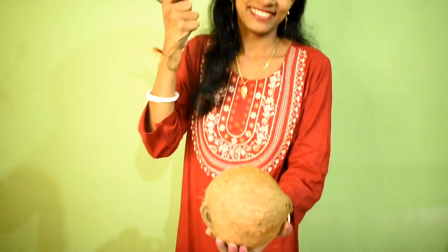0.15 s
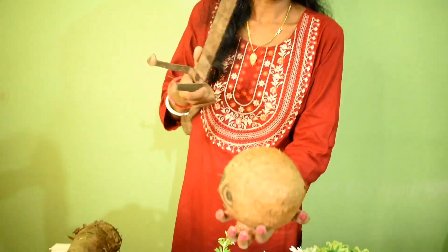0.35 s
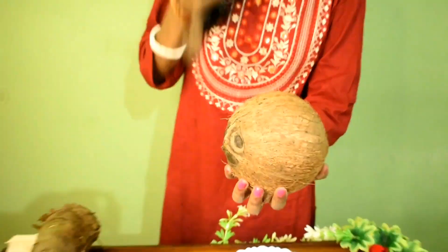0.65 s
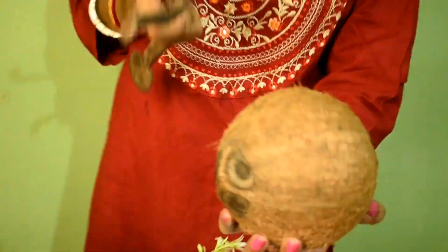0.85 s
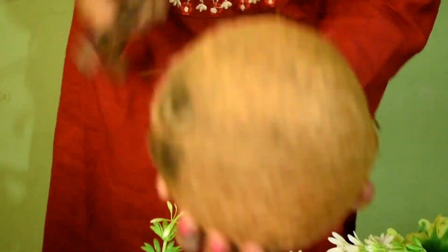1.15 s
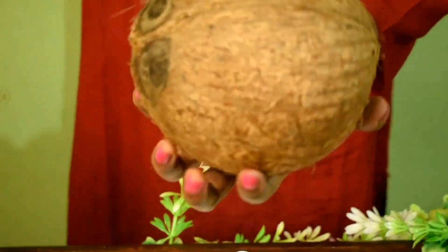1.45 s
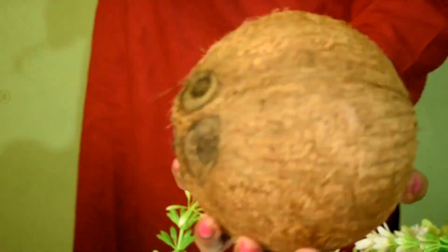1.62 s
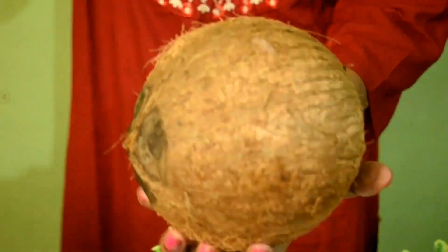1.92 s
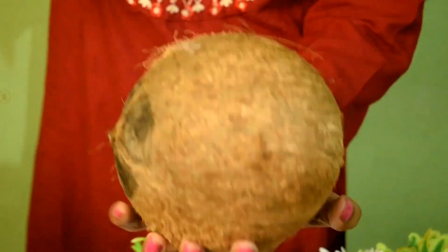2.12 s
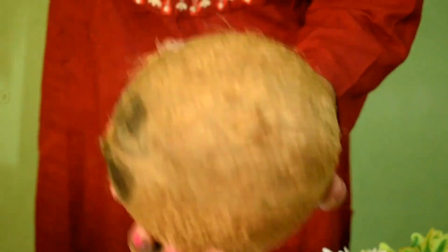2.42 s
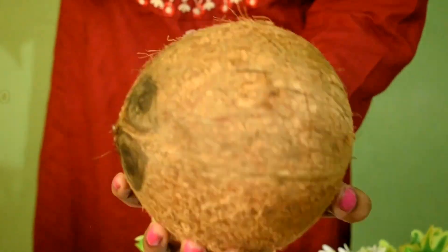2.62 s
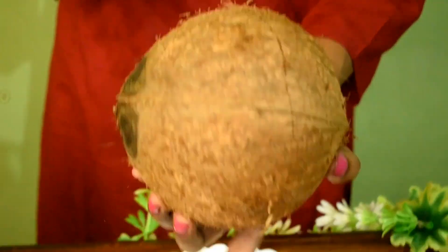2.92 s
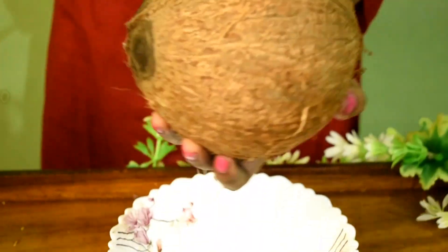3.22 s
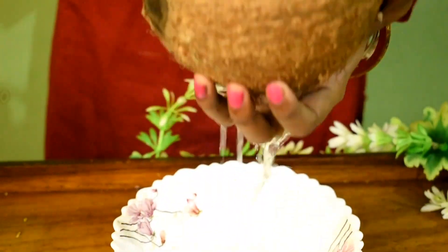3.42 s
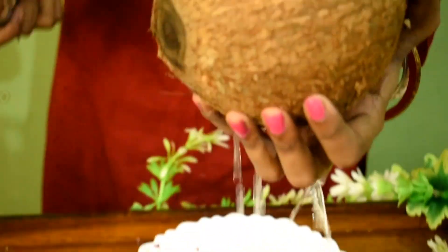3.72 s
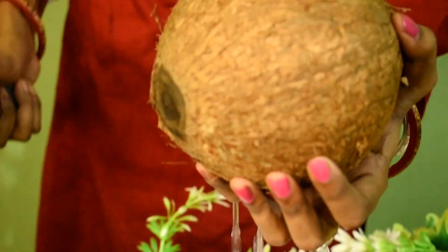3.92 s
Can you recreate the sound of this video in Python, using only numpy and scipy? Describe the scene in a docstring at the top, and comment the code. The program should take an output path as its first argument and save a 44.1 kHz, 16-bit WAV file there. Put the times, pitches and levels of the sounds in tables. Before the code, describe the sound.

Close stereo microphones capture six full, overdriven coconut chops after the fading echo of an earlier one, with small clicking scuffs halfway between. The hard room answers each with a dense, flattened crash. Then come cracking snaps, a dying echo, a short husk rustle, and quiet fan hum. A thin seep of water grows into a bubbly patter with bigger plops at the end.

```python
"""First the dying echo of a chop: a heavy iron blade strikes a hand-held coconut in a bare, ringing room.
Crunch and shell rings make each chop; a lighter tap, a scuff with three bright rings, falls between chops.
The seventh chop splits the shell in snaps and knocks, husk fibres hiss in the palm, and the water starts to
trickle onto a plate as rising bubbles over a spray. Behind, a fan throbs: motor tones and an air wash.
The blows overload the recorder, whose limiter flattens the room's echo into a long crash."""
import sys
import numpy as np
from scipy import signal
from scipy.fft import rfft, irfft, next_fast_len
from scipy.io import wavfile

SR = 44100
rng = np.random.default_rng(int(sys.argv[2]) if len(sys.argv) > 2 else 0)


def wrap_up_sound(samples):
    """Save the sound to the file named by the first command line argument, as 16-bit audio."""
    columns = np.atleast_2d(samples).T
    # keep every value between -1 and 1, then stretch to whole-number steps
    tamed = np.clip(columns, -1, 1)
    steps = np.round(tamed * 32767).astype(np.int16)
    wavfile.write(sys.argv[1], SR, steps)


N = 178716
TIME = np.arange(N) / SR
BRIEF = TIME[:SR // 8]  # the time axis of one short sound


# Heavy chops on the nut. Each row: start in seconds, level in dB, treble in dB,
# thump in dB relative to the chop.
CHOPS = [(-.095, -3, -1, -45), (0.3496, 6.5, 0, -23), (.805, 4.5, 0.5, -4), (1.2523, 6.5, 1.5, -13),
         (1.685, 3, 5, -14), (2.1294, 4, 1.5, -5), (2.5518, 6, 6, -9.5)]
# Resonances of the shell under the blade. Each row: pitch in Hz, level in dB, 60 dB decay time in s.
SHELL_RINGS = [(866, -9, 0.0098), (1563, -17.5, 0.048), (2435, -16.5, 0.021), (3140, -9.5, 0.0037),
               (4190, -7.5, 0.0026), (5230, -10, 0.0046)]
# Spectrum of the breaking husk and shell. Each row: frequency in Hz, level in dB per Hz.
CRACK_SPECTRUM = [(20, -41), (130, -40), (250, -20.5), (450, -14), (750, -6), (1200, 0), (2000, 0.5),
                  (4000, 1.5), (6000, -3.5), (9000, -9), (13500, -18), (15000, -18), (16000, -77)]


def chops(treble_hz=4500, push_s=0.0012, room_db=8):
    """The blade bites through the husk, rings the shell and shoves the nut into the palm."""
    out = np.zeros((2, N))
    for start_s, db, treble_db, thump_db in CHOPS:
        shell = 0
        for hz, ring_db, t60 in SHELL_RINGS:
            # each ring varies by about 1 dB from blow to blow
            shell = shell + from_db(ring_db + rng.normal()) * ring(hz, t60)
        blow = burst(crack(CRACK_SPECTRUM, t60=0.017, grit_db=12.5) + shell)
        treble = blow - lag(blow, corner(treble_hz))
        blow = blow + (from_db(treble_db) - 1) * treble
        add(out, start_s, from_db(db) * blow, room_db)
        # the shove is one brief push of air, nearly without echo
        push = np.exp(-BRIEF / push_s)
        add(out, start_s, from_db(db + thump_db) * push, room_db=-30)
    return out


# Light taps between the chops. Each row: start in seconds, level in dB, spot touched from 0 to 1,
# clatter in dB.
TAPS = [(.125, -12, 0.07, 2), (.598, -13.5, 0.98, -8.5), (1.0362, -9, 0.18, 0.5), (1.474, -11.5, 0.2, -3.5),
        (1.915, -10, 0.1, -18), (2.337, -7, 0.78, 2.5)]
# Spectrum of a tap's scuff. Each row: frequency in Hz, level in dB per Hz.
SCUFF_SPECTRUM = [(20, -68), (130, -36.5), (300, -19), (800, -0.5), (1300, 0), (2700, 0), (5500, -10),
                  (7500, -11), (11000, -22), (15000, -28)]
# From spot 0 to spot 1 the main ring weakens and the two higher ones close in; these are set at spot 0.
MAIN_RING_HZ, MIDDLE_RING_HZ, UPPER_RING_HZ = 3110, 3352, 4947
MAIN_RING_DB, UPPER_RING_DB = 6.5, 2
SPOT_LOSS_DB, MIDDLE_RISE_OCTAVES, UPPER_FALL_OCTAVES = 5.5, 0.13, 0.212
# A clattering contact feeds the higher rings and damps the main one: shares of the clatter's dB.
UPPER_FOLLOWS, DAMPING_FOLLOWS = 0.36, 0.37


def taps(room_db=0.5, main_t60=0.011, middle_t60=0.015, upper_t60=0.015, scuff_db=1.5):
    """Light contacts: a short scuff and three bright rings whose mix depends on the spot touched."""
    out = np.zeros((2, N))
    for start_s, db, spot, clatter_db in TAPS:
        scuff = from_db(scuff_db) * crack(SCUFF_SPECTRUM, t60=0.021, grit_db=28)

        damped_t60 = main_t60 / from_db(DAMPING_FOLLOWS * clatter_db)
        main = from_db(MAIN_RING_DB - SPOT_LOSS_DB * spot) * ring(MAIN_RING_HZ, damped_t60)

        middle_hz = MIDDLE_RING_HZ * 2 ** (MIDDLE_RISE_OCTAVES * spot)
        middle = from_db(clatter_db) * cluster(middle_hz, middle_t60)

        upper_hz = UPPER_RING_HZ / 2 ** (UPPER_FALL_OCTAVES * spot)
        upper_db = UPPER_RING_DB + UPPER_FOLLOWS * clatter_db
        upper = from_db(upper_db) * cluster(upper_hz, upper_t60)
        add(out, start_s, from_db(db) * (scuff + main - middle - upper), room_db)
    return out


# The shell tearing open and shifting in the hand. Each row: start in seconds, snap level in dB,
# hollow knock level in dB, knock pitch in Hz.
SPLITS = [(2.556, -6, -4.5, 612), (2.597, 0, -5.5, 665), (2.642, -11, -11.5, 562), (2.659, -5.5, -12, 840),
          (3.018, -33.5, -30, 674), (3.036, -53, -36, 676)]


def splits():
    """The crack runs on in snaps, and the opened nut knocks hollow."""
    out = np.zeros((2, N))
    for start_s, snap_db, knock_db, knock_hz in SPLITS:
        snap = from_db(snap_db) * crack(CRACK_SPECTRUM, t60=0.043, grit_db=10)
        knock = from_db(knock_db) * ring(knock_hz, t60=0.015)
        add(out, start_s, snap + knock, room_db=1.0)
    return out


# Spectrum of the rubbing husk. Each row: frequency in Hz, level in dB per Hz.
HUSK_SPECTRUM = [(100, -1), (700, 17), (1500, -4.5), (4000, 5), (8000, 0), (15000, 0.5)]
# The husk rubs in the palm ever harder until the nut settles; its level peaks at the stop.
RUB_START_S, RUB_STOP_S, RUB_PEAK_DB = 2.72, 3.01, -31.5
RUB_SWELL_DB_PER_S, RUB_RELEASE_DB_PER_S = 55, 165


def husk():
    """Fibres rub in the palm: a hiss that swells after the last chop and dies when the nut settles."""
    swell_db = RUB_SWELL_DB_PER_S * (RUB_STOP_S - TIME)
    release_db = RUB_RELEASE_DB_PER_S * (TIME - RUB_STOP_S)
    level = from_db(RUB_PEAK_DB - np.maximum(swell_db, release_db))
    hiss = rms_one(colour(diffuse(N), HUSK_SPECTRUM))
    return ramp(RUB_START_S, attack_s=0.063) * level * hiss


# Big drops on the plate. Each row: start in seconds, level in dB, starting pitch of the bubble in Hz.
DROPS = [(3.473, -45.5, 10400), (3.772, -54, 2780), (3.807, -38.5, 7000), (3.8637, -30, 4920),
         (3.877, -33, 4180), (3.903, -31.5, 2570), (3.9468, -28, 2580), (3.953, -31.5, 2360),
         (4.006, -24.5, 2720), (4.007, -20.5, 4600)]
# Spectrum of a drop's splat. Each row: frequency in Hz, level in dB per Hz.
SPLAT_SPECTRUM = [(300, -19), (1500, -8.5), (3000, -6), (7000, 2), (10000, -8), (15000, -5)]
# Spectrum of the fine spray. Each row: frequency in Hz, level in dB per Hz.
SPRAY_SPECTRUM = [(300, -8), (1500, 8), (3000, 2), (6000, 2), (10000, 8), (15000, 3)]
# A bubble climbs faster the lower it starts and the harder its drop falls; the rate is a typical drop's.
TYPICAL_DROP_DB, TYPICAL_BUBBLE_HZ, RISE_OCTAVES_PER_S = -29, 3020, 110
RISE_FOLLOWS, RISE_PITCH_POWER, BUBBLE_T60_S = 0.78, 1.8, 0.027
# The water first seeps thinly; when the crack gives way the flow swells evenly to a pour.
SEEP_S, SEEP_ATTACK_S, SEEP_DB = 3.54, 0.055, -51.5
POUR_S, POUR_ATTACK_S, POUR_DB = 3.767, 0.23, -38


def water():
    """Big drops strike the plate, and thin streams patter over a fine spray."""
    return big_drops() + streams()


def big_drops(splat_db=-4, droplet_db=-10, scatter_s=0.014):
    """Each drop splats, traps a bubble that rises in pitch, and throws off three droplets."""
    out = np.zeros((2, N))
    for start_s, db, hz in DROPS:
        pitch_factor = (TYPICAL_BUBBLE_HZ / hz) ** RISE_PITCH_POWER
        force_factor = from_db(RISE_FOLLOWS * (db - TYPICAL_DROP_DB))
        rise = RISE_OCTAVES_PER_S * pitch_factor * force_factor
        splat = crack(SPLAT_SPECTRUM, t60=0.048, grit_db=10)
        drop = ring(hz, BUBBLE_T60_S, rise) + from_db(splat_db) * splat
        for late, pitch in rng.random((3, 2)):
            droplet_hz = hz * 1.6 ** (2 * pitch - 0.5)
            droplet = ring(droplet_hz, BUBBLE_T60_S / 2, rise / 2)
            drop = drop + from_db(droplet_db) * np.roll(droplet, int(late * scatter_s * SR))
        add(out, start_s, from_db(db) * drop, room_db=-5.5)
    return out


def streams(drops_per_s=450, spread_db=3.5, spray_db=-2):
    """Many small bubbles at random times and pitches patter over a hiss of spray as the flow grows."""
    patter = np.zeros(N + len(BRIEF))
    for place, pitch, size in rng.random((int(drops_per_s * N / SR), 3)):
        hz = 2000 * 6 ** pitch
        first = int(place * N)
        # a few bubbles stand out well above the rest
        level_db = -spread_db * np.log(max(size, 0.02))
        patter[first:first + len(BRIEF)] += from_db(level_db) * ring(hz, t60=30 / hz, rise=29)
    spray = from_db(spray_db) * rms_one(colour(diffuse(N), SPRAY_SPECTRUM))
    seep = from_db(SEEP_DB) * ramp(SEEP_S, SEEP_ATTACK_S)
    pour = from_db(POUR_DB) * ramp(POUR_S, POUR_ATTACK_S)
    return (seep + pour) * rms_one(rms_one(patter[:N]) + spray)


# Tones of the fan motor. Each row: pitch in Hz, level in dB, depth of the throb from 0 to 1.
MOTOR_TONES = [(197, -54.5, 0.15), (220.3, -47.5, 0), (242, -55.5, 0), (261, -52.5, 0.03), (413.6, -47, 1),
               (443.7, -46.5, 0.05), (447.8, -47, 0.24), (620, -52, 0.4), (680, -51, 0.4),
               (844, -55.5, 0.2), (1490, -59, 0.2), (5760, -69, .4)]
# Spectrum of the air chopped by the blades. Each row: frequency in Hz, level in dB per Hz.
WASH_SPECTRUM = [(150, -60), (330, -8), (420, -3), (520, -16.5), (680, 5.5), (900, -19), (1500, -15),
                 (3000, -53)]
# Spectrum of the room's steady rush. Each row: frequency in Hz, level in dB per Hz.
AIR_SPECTRUM = [(20, -16), (50, -10), (100, -3), (160, -7), (230, 1.5), (330, 5), (700, 9.5), (1000, 1.5),
                (1500, -1.5), (2000, -7.5), (4000, -12.5), (8000, -20), (16000, -21.5)]
# The fan's blades pass at a steady rate; one of the throbs peaks at THROB_S.
BLADE_PASS_HZ, THROB_S = 10.82, 3.49


def fan(wash_db=-47, wash_depth=0.21, sway=2.6, air_db=-42.5, waver=0.85, waver_s=0.043):
    """Motor tones and a wash of air, both chopped by the passing blades, over the room's steady rush."""
    throb = np.cos(2 * np.pi * BLADE_PASS_HZ * (TIME - THROB_S))
    hum = 0
    for hz, db, depth in MOTOR_TONES:
        # tones that the blades scatter most also waver most
        wander = waver * rms_one(lag(lag(rng.standard_normal(N), waver_s), waver_s))
        phase = 2 * np.pi * (hz * TIME + rng.random()) + depth * (sway * throb + wander)
        hum = hum + from_db(db) * np.sqrt(2) * (1 + depth * throb) * np.sin(phase)
    wash = from_db(wash_db) * rms_one(colour(diffuse(N), WASH_SPECTRUM)) * (1 + wash_depth * throb)
    air = from_db(air_db) * rms_one(colour(diffuse(N), AIR_SPECTRUM))
    return hum + wash + air


# How the bare room dies away. Each row: frequency in Hz, 60 dB decay time in s.
ROOM_DECAY = [(100, 0.28), (700, 0.4014), (1500, 0.405), (3500, 0.3718), (6000, 0.3833), (10000, 0.3085),
              (16000, 0.33)]
# Standing waves between the walls. Each row: pitch in Hz, level in dB.
STANDING_WAVES = [(443, -19.5), (528, -25.5), (665, -24), (802, -22.5), (959, -24.5), (1044, -22.5),
                  (1557, -28), (1668, -28.5), (2162, -32)]
WALL_DELAY_S, EARLY_DB = 0.02, -5.5


def room_echo(mode_t60=0.49, build_s=0.0021):
    """Stereo response of the room: weak early scatter, then the walls answer and die away band by band."""
    t, hz = TIME[:SR], np.fft.rfftfreq(SR, 1 / SR)
    noise = rfft(diffuse(SR))
    centres = np.array(ROOM_DECAY)[:, 0]
    tail = 0
    # each band fades into its neighbours
    for share, (_, t60) in zip(np.eye(len(centres)), ROOM_DECAY):
        band = irfft(noise * at_hz(np.c_[centres, share], hz), SR)
        tail = tail + band * from_db(-60 * t / t60)
    for mode_hz, db in STANDING_WAVES:
        mode = np.sin(2 * np.pi * (mode_hz * t + rng.random()))
        tail = tail + from_db(db) * mode * from_db(-60 * t / mode_t60)
    walls_s = [WALL_DELAY_S - build_s, WALL_DELAY_S + build_s]
    tail = tail * from_db(np.interp(t, walls_s, [EARLY_DB, 0]))
    return tail / np.sqrt(np.sum(tail ** 2) / 2)


def add(out, start_s, sound, room_db, shade_hz=7000):
    """Place a short sound in the room; the nut shades its direct treble and moves, so each echo is new."""
    heard = from_db(room_db) * signal.fftconvolve(sound[None], room_echo(), axes=1)
    heard[:, :len(sound)] += lag(sound, corner(shade_hz))
    start = round(start_s * SR)
    # a sound that starts before time 0 is heard only from there on
    heard = heard[:, max(-start, 0):N - start]
    first = max(start, 0)
    out[:, first:first + heard.shape[1]] += heard


# Left-right likeness of diffuse sound at the microphones. Each row: frequency in Hz, likeness from 0 to 1.
LIKENESS = [(40, .75), (130, .88), (300, .994), (700, .998), (1400, .997), (2800, .972), (5600, .92),
            (10000, .82), (15000, .58)]


def diffuse(size):
    """White stereo noise, most alike in the low middle, a little less in the deep bass, least in the treble."""
    alike = np.clip(at_hz(LIKENESS, np.fft.rfftfreq(size, 1 / SR)), 0, 1)
    mid, side = rfft(rng.standard_normal((2, size)))
    shared = np.sqrt((1 + alike) / 2) * mid
    opposed = np.sqrt((1 - alike) / 2) * np.array([side, -side])
    return irfft(shared + opposed, size)


def ring(hz, t60, rise=0):
    """A struck resonance that builds up over about a cycle; a bubble also rises, in octaves per second."""
    pitch = hz * 2 ** (rise * np.minimum(BRIEF, t60))
    cycles = np.cumsum(np.minimum(pitch, SR / 2)) / SR
    return burst(np.sin(2 * np.pi * cycles) * (1 - np.exp(-cycles)) * from_db(-60 * BRIEF / t60))


def cluster(hz, t60, spread=0.16, count=6):
    """Close modes of an uneven body, strongest in the middle, which blur into one broad ring."""
    modes = hz * (1 + spread * np.linspace(-1, 1, count))
    strengths = np.hanning(count + 2)[1:-1] * rng.choice([-1, 1], count)
    return burst(sum(strength * ring(mode, t60) for strength, mode in zip(strengths, modes)))


def crack(spectrum, t60, grit_db):
    """A sharp contact and the crunch of fibres; so many break that no pitch stands out."""
    contact = burst(1.0 * (BRIEF == 0))
    grit = burst(rng.standard_normal(len(BRIEF)) * from_db(-60 * BRIEF / t60))
    snaps = rfft(contact + from_db(grit_db) * grit)
    # keep the phases, level the spectrum, and stop at t60
    even = irfft(snaps / np.abs(snaps), len(BRIEF)) * (BRIEF < t60)
    return burst(colour(even, spectrum))


def colour(x, spectrum):
    """Causal (minimum-phase) filter with the given spectrum, made by folding its cepstrum."""
    size = 2 * next_fast_len(x.shape[-1])
    gain = from_db(at_hz(spectrum, np.fft.rfftfreq(size, 1 / SR)))
    cepstrum = irfft(np.log(gain))
    causal = 2 * cepstrum[:size // 2] * (np.arange(size // 2) > 0)
    response = np.exp(rfft(causal, size))
    return irfft(rfft(x, size) * response)[..., :x.shape[-1]]


def at_hz(points, hz):
    """Read a table on a log-frequency axis."""
    table = np.array(points)
    return np.interp(np.log(np.maximum(hz, 1)), np.log(table[:, 0]), table[:, 1])


def lag(x, seconds):
    """One-pole smoothing."""
    r = np.exp(-1 / (seconds * SR))
    return signal.lfilter([1 - r], [1, -r], x)


def corner(hz):
    """Smoothing time in seconds of a one-pole filter with this corner frequency."""
    return 1 / (2 * np.pi * hz)


def ramp(start_s, attack_s):
    """Rise evenly from 0 to 1, then hold."""
    return np.clip((TIME - start_s) / attack_s, 0, 1)


def from_db(db):
    """Decibels to gain."""
    return 10 ** (np.asarray(db) / 20)


def rms_one(x):
    """Scale to rms 1."""
    return x / np.sqrt(np.mean(x ** 2) + 1e-20)


def burst(x):
    """Scale a short sound to the energy of 10 ms at rms 1."""
    return x / np.sqrt(np.sum(x ** 2) / (SR / 100))


def scene():
    """Blows, splitting shell, rubbing husk, water and fan."""
    return chops() + taps() + splits() + husk() + water() + fan()


def hold(db, fall_db_per_s):
    """Follow every rise at once, and fall no faster than the given rate."""
    return np.maximum.accumulate(db + fall_db_per_s * TIME) - fall_db_per_s * TIME


def limiter(x, limit_db=-11.5, attack_s=0.00057, fast_db_per_s=520, slow_db_per_s=8,
            slow_share=0.39, memory_s=0.053):
    """Gain falls in milliseconds and springs back; a part built up by long loud sounds returns slowly."""
    power = lag(np.mean(x ** 2, axis=0), seconds=0.0045)
    level_db = 10 * np.log10(power + 1e-12)
    excess_db = np.maximum(level_db - limit_db, 0)
    fast = lag(hold(excess_db, fast_db_per_s), attack_s)
    slow = hold(slow_share * lag(fast, memory_s), slow_db_per_s)
    return x * from_db(-np.maximum(fast, slow))


def record(dry, top=1.0, low_cut_hz=80, cutoff_hz=15900, left_db=-0.3):
    """The front of each blow slips past the limiter and saturates; the deep bass and the top are cut."""
    held = limiter(dry) * from_db([[left_db], [0]])
    clipped = held / (1 + (held / top) ** 4) ** (1 / 4)
    thinned = clipped - lag(clipped, corner(low_cut_hz))
    top_cut = signal.ellip(10, 0.2, 95, cutoff_hz, fs=SR, output="sos")
    return signal.sosfilt(top_cut, thinned)


dry = scene()
out = record(dry)
wrap_up_sound(out)
```